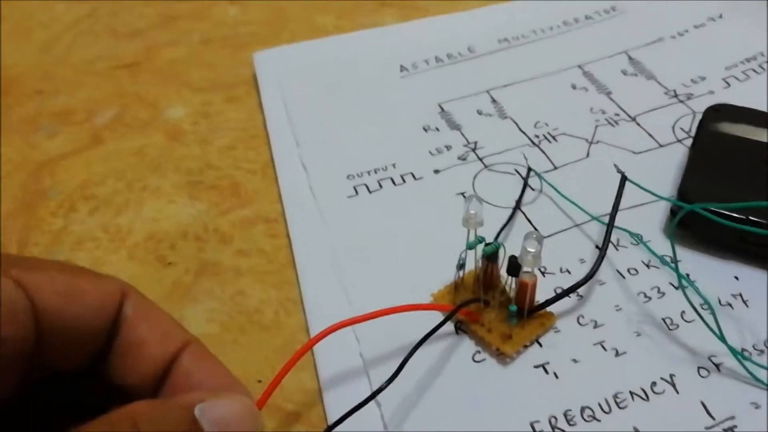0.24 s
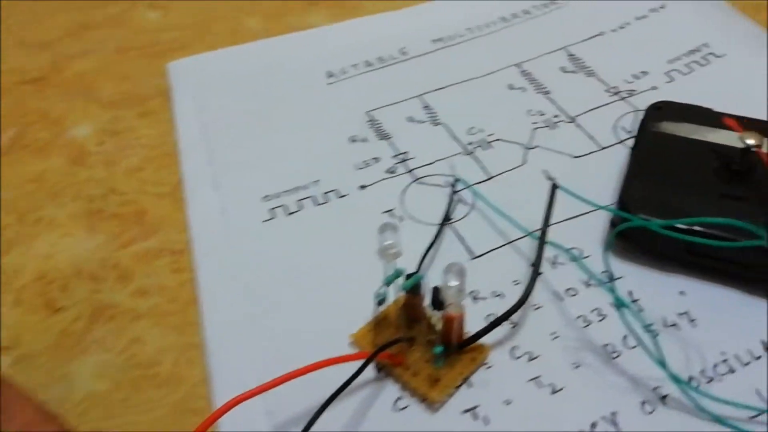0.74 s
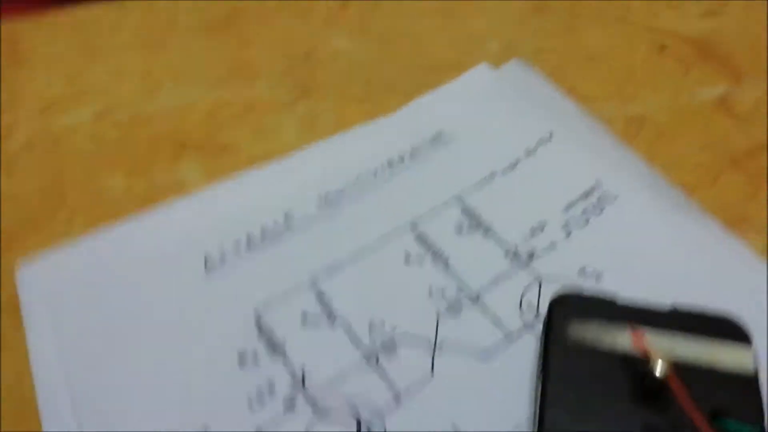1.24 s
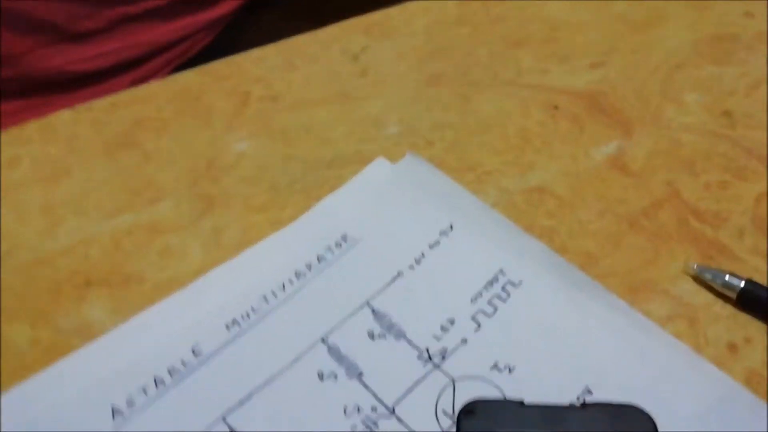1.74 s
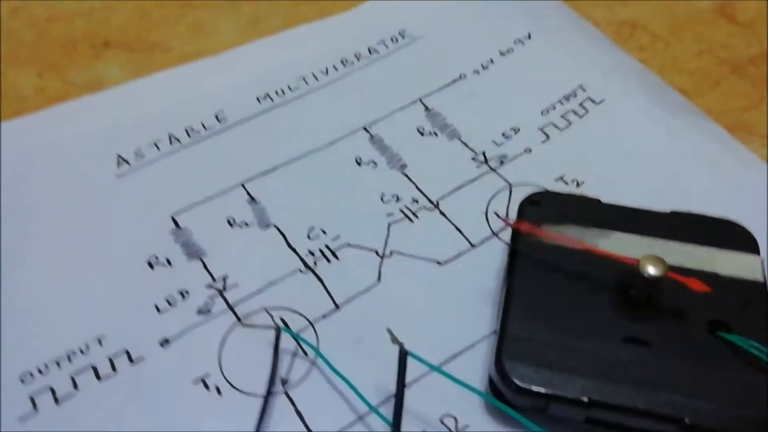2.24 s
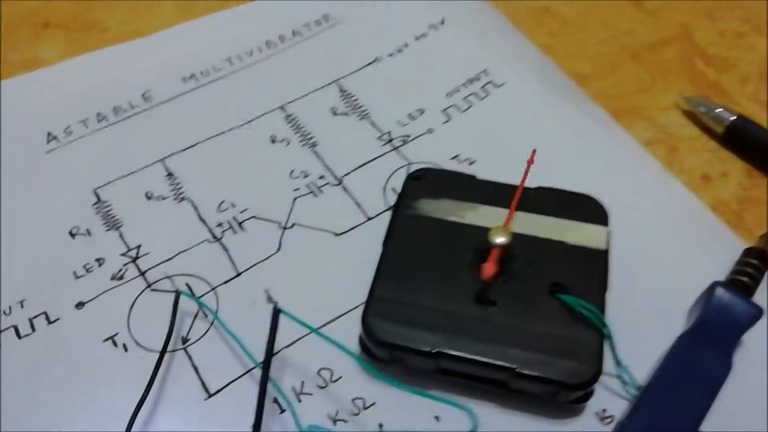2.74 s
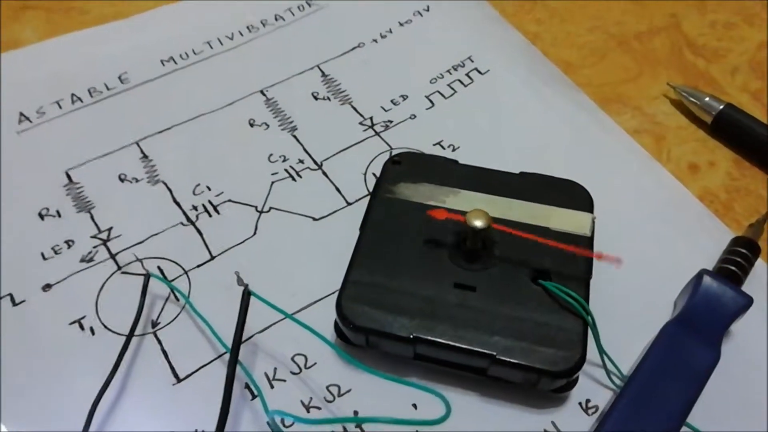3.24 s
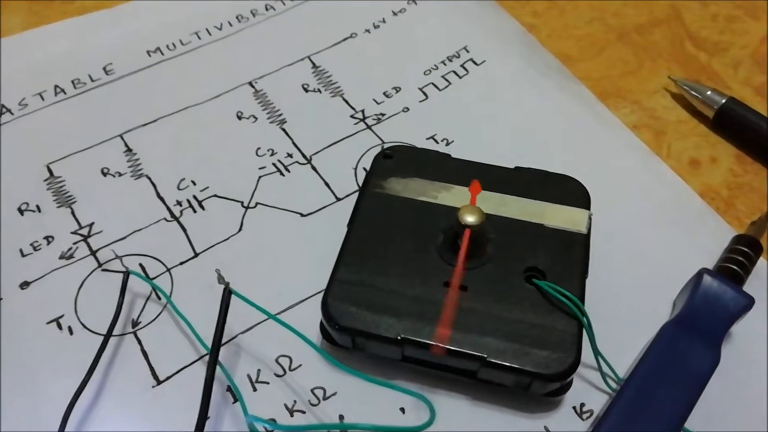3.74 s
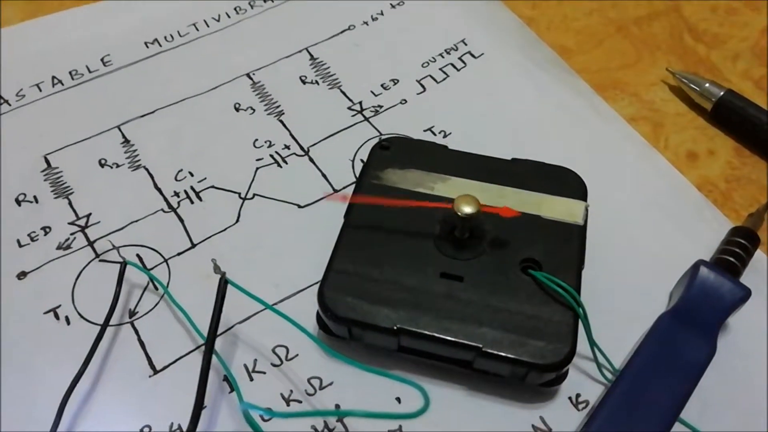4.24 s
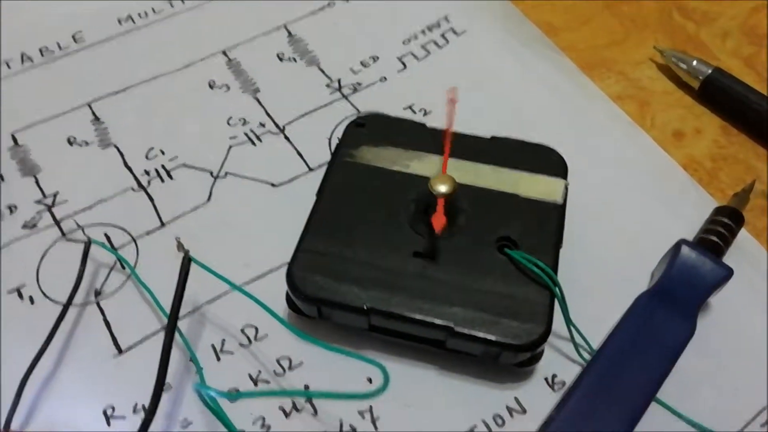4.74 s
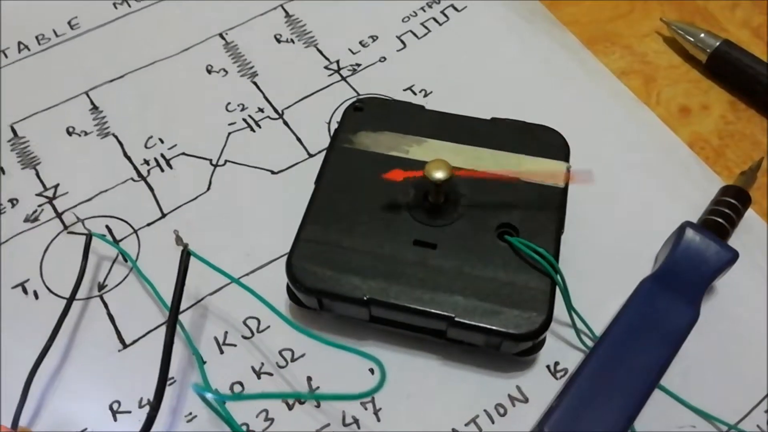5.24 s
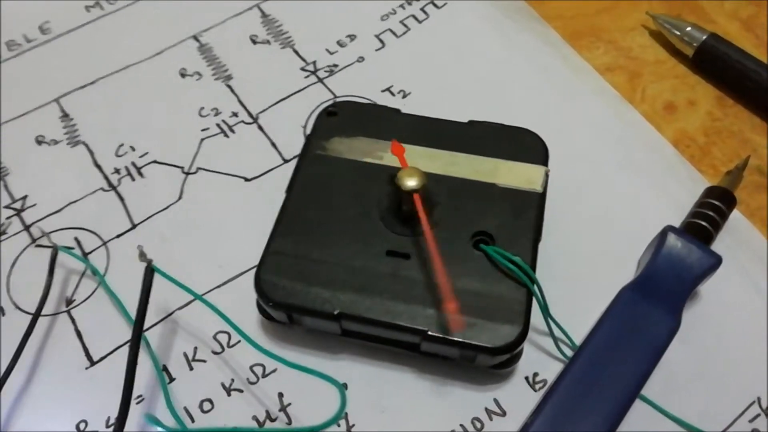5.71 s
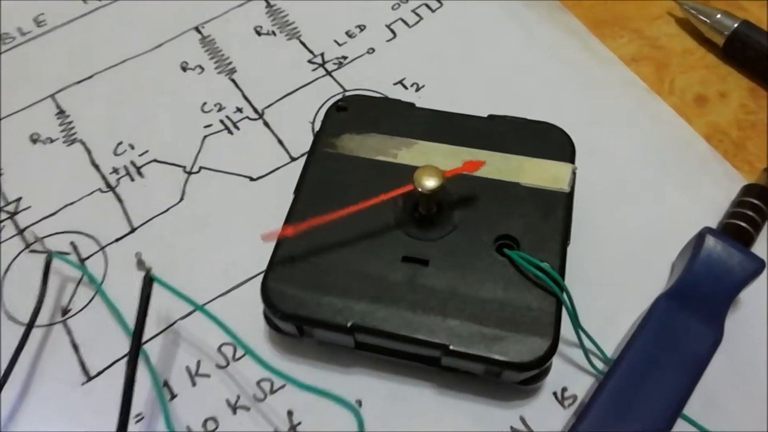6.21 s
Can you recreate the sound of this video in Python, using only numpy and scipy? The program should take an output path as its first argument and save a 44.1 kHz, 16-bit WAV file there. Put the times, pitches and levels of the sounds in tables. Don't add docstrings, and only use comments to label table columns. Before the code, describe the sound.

Close, slightly unsteady stereo phone pickup of a tiny clock mechanism on a bench. Low room hum and a muffled knock come first, then a faint hum swells and plastic gears begin to chatter, pulsing faster until steady at about a dozen throbs a second. Brighter ticks poke through, with gusts of low air and heavy bumps on the microphone.

```python
import sys
import numpy as np
from scipy import signal
from scipy.fft import rfft, irfft
from scipy.io import wavfile
from scipy.ndimage import uniform_filter1d, map_coordinates

SR = 44100
rng = np.random.default_rng(int(sys.argv[2]) if len(sys.argv) > 2 else 0)


def voltage_ratio(level):
    return 10 ** (np.asarray(level, float) / 20)


def digitize_waveform(pressure):
    field = np.atleast_2d(pressure).T
    bounded = np.clip(field, -1, 1)
    quanta = np.round(bounded * 32767).astype(np.int16)
    wavfile.write(sys.argv[1], SR, quanta)


N = 285395
T = np.arange(N) / SR

# (time [s], strength [dB], brightness [dB])
HARD_STRIKES = [(1.593, -63.5, -37), (1.688, -58, -2), (1.774, -59, -32), (1.954, -49, -8),
                (2.062, -53.5, -28), (2.397, -51, -5), (2.506, -43, 2), (2.569, -63, 16), (2.733, -54, 10),
                (2.833, -37.5, -1.5), (2.895, -50, -3), (2.976, -44, 3), (3.114, -50.5, -7),
                (3.46, -62, 17), (3.53, -51, 1), (3.812, -52.5, -2), (3.875, -52.5, 3), (4.149, -49, -5),
                (4.413, -50.5, -2), (4.657, -52, 7), (4.702, -51, 5), (4.731, -53, 3), (4.872, -51, 8),
                (5.017, -51.5, -1), (5.317, -63, 13), (5.52, -58, -6), (5.635, -53, 6), (5.733, -56.5, 12),
                (5.881, -43.5, 1.5), (5.996, -51, -3)]
# (time [s], motor level [dB], turn of the phone)
RATTLE = [(1.35, -90, 10), (1.49, -76, 13), (1.55, -67.5, 14), (1.62, -63, 14.5), (1.8, -62, 11.5),
          (2.1, -60.5, 11.5), (2.45, -61.5, 9.5), (2.8, -61, 8.5), (3.02, -64, 9), (3.18, -69, 5.5),
          (3.4, -63.5, 2.5), (3.8, -67.5, 3), (4.3, -64.5, 4), (4.75, -65.5, 3.5), (5.15, -65, 3.5),
          (5.6, -63, 3.5), (6.0, -67.5, 1.5), (6.47, -63.5, 8.5)]
# (time [s], turns made [1])
ROTOR_TURNS = [
    (1.591, 0),
    (2.156, 6),
    (2.299, 8),
    (2.83, 14),
    (3.528, 24),
    (4.236, 34),
    (4.657, 40),
    (5.02, 45),
    (5.881, 57),
    (6.444, 65),
]
# (frequency [Hz], width [Hz], level [dB])
CASE_LEFT_MODES = [(2432, 430, 1.5), (2807, 190, -1), (3220, 290, -3), (3640, 166, -6.5), (1834, 70, -7.5)]
CASE_RIGHT_MODES = [(1914, 114, 1), (2288, 320, 5), (2740, 220, -3.5), (3440, 230, -17)]
# (frequency [Hz], width [Hz], level [dB])
PORT_LEFT_MODES = [(4200, 200, -4.5), (4990, 380, 4.5), (5670, 330, 3.5), (7220, 180, -11),
                   (7970, 120, -12.5)]
PORT_RIGHT_MODES = [(7930, 210, -7), (8567, 130, 8), (9210, 590, -2.5), (8170, 240, -3.5)]
# (frequency [Hz], width [Hz], level [dB])
FACE_LEFT_MODES = [(6160, 480, -3), (6630, 550, -10)]
FACE_RIGHT_MODES = [(4220, 260, 4.5), (5100, 650, -5), (5800, 450, -2), (6280, 300, -0.5), (6830, 350, -9)]
# (frequency [Hz], width [Hz], level [dB])
BENCH_MODES = [(1137, 188, -4), (1538, 310, -4.5)]
# (time [s], peak [dB], width [ms])
PUSHES = [(0.893, -36.5, 3), (1.327, -45, 2.9), (1.512, -39, 4.3), (2.084, -44, 8.8), (2.325, -30.5, 4.8),
          (2.366, -34, 6.4), (2.403, -34, 5.2), (2.419, -35, 4.4), (2.503, -29, 3.9), (2.528, -45, 4.4),
          (2.543, -29, 3.2), (2.577, -31.5, 3.6), (2.598, -34, 3.3), (2.625, -37, 3.04),
          (2.653, -23.5, 1.9), (2.664, -17, 2.6), (2.673, -25.5, 1.85), (2.682, -21.5, 2.74),
          (2.686, -30, 6.6), (2.701, -29.5, 5.4), (2.864, -39, 8.5), (4.214, -27.5, 3.9),
          (4.263, -33.5, 7.3), (4.28, -44, 6.8), (4.337, -37, 6.1), (4.352, -35, 5.7), (5.239, -38.5, 6.8),
          (5.294, -38.5, 5.2), (5.354, -40.5, 4.6), (6.456, -37, 4.1)]
# (centre [s], peak [dB], half length [s], upper rumble [dB])
AIR_GUSTS = [(0.363, -58, 0.093, -6), (.8, -48.5, 0.14, -13), (1.22, -73, 0.059, 5), (1.516, -50, 0.13, -8),
             (1.803, -65, 0.11, -21), (2.043, -58, 0.041, -1), (2.497, -41.5, .12, -4.5),
             (2.845, -52.5, .05, -16), (3.472, -56, 0.089, -8.5), (3.89, -59, 0.036, -20),
             (4.195, -42.5, 0.079, -6), (4.405, -49.5, 0.044, -8), (4.926, -50.5, 0.037, -3.5),
             (5.3, -56, 0.077, -4), (5.557, -58.5, 0.055, -8), (6.09, -50.5, 0.04, -10),
             (6.358, -52, 0.072, -3)]
# (frequency [Hz], level [dB], decay time t60 [s])
KNOCK_MODES = [(570, -49.5, 0.34), (716, -48.5, 0.42), (882, -40.5, 0.25), (1110, -58, 0.84),
               (1530, -55, 0.76), (2270, -56, .3), (3240, -61, 0.24), (4600, -64, 0.2), (6550, -59, 0.22)]
# (frequency [Hz], density [dB per Hz])
ROOM_SPECTRUM = [(59, -32), (100, -16.5), (219, -1), (388, -9.5), (470, -15.5), (749, -10), (925, -18),
                 (1100, -15.5), (1860, -19.5), (2400, -26.5), (3910, -34), (6230, -32), (7540, -38.5),
                 (14900, -37.5), (15800, -39)]
# (frequency [Hz], correlation [1])
PORT_LIKENESS = [(100, 1), (300, 0.93), (450, 0.0096), (650, -0.25), (950, -0.53), (1500, 0.76),
                 (2200, -0.023), (16000, -0.082)]
# (frequency [Hz], width [Hz], gain added to 1 [1])
ROOM_TINT_LEFT = [(7200, 190, -0.028), (725, 500, -0.33), (9000, 1800, -0.17)]
ROOM_TINT_RIGHT = [(1878, 200, 1), (8800, 600, 0.52), (10000, 240, 0.86), (6460, 1500, -0.34)]

TOOTH_HZ, TOOTH_JITTER, TOOTH_SCATTER_DB = 117.1, 0.25, 4
THROB_S, THROB_DB, THROB_TURNS, STRIKE_THROB = 0.014, 4.5, 0.2, 0.22
TURN_SCATTER_DB, TURN_DB = 2.5, -3.5
CASE_KICK_DB, PORT_KICK_DB = 3, 4
LOOSE_DB, LOOSE_SCATTER_DB, LOOSE_SPREAD_S, LOOSE_BRIGHT_DB, BETWEEN_DB = 5.5, 3.5, 0.01186, 1, -3
WHEEL_TURNS, WHEEL_AT_TURN, WHEEL_DB = 8.83, 14.53, 1
RIGHT_DB, RIGHT_SHADE = -5.5, 0.41
HUM_DB, HUM_TURN, HUM_START_S, HUM_RISE_S = -73.5, 0.63, 1.24, 0.079
STRAIN_S, STRAIN_WIDTH_S, STRAIN_DB = 1.44, 0.08, -1
CALM_DB, CALM_UPPER_DB = -65.5, -75.5
KNOCK_S, ROOM_DB = 0.176, -55
NOTCH_HZ, NOTCH_WIDTH_HZ, NOTCH_DB = 7560, 130, -3


def motor():
    s, *columns = np.transpose(RATTLE)
    case_db, pan_db = (np.interp(T, s, c) for c in columns)
    left_db = case_db + 0.3
    right_db = case_db + RIGHT_DB - RIGHT_SHADE * pan_db
    strain = np.exp(-0.5 * ((T - STRAIN_S) / STRAIN_WIDTH_S) ** 2)
    hum_db = HUM_DB + HUM_TURN * pan_db + STRAIN_DB * strain
    hum_db = hum_db - 25 / (1 + np.exp((T - HUM_START_S) / HUM_RISE_S))

    when, strike_db, bright_db = hard_strikes()
    strike_right = strike_db + bright_db / 2
    strike_case = strike_db - bright_db / 2
    strike_left = strike_db - 6.0 + 0.24 * np.interp(when, T, pan_db)

    throb = throbbing()
    case_db = case_db + CASE_KICK_DB * (throb - 0.5)
    left_db = left_db + PORT_KICK_DB * (throb - 0.5)
    right_db = right_db + PORT_KICK_DB * (throb - 0.5) + WHEEL_DB * wheel(T)
    mesh = teeth(throb)
    grit = rng.standard_normal((2, N))

    def part(modes, level_db, hit_db, width_s, turn_db, side=0):
        body = ring(modes)
        rubbing = mesh * np.sign(grit[1]) ** side
        steady = voltage_ratio(level_db) * unit(signal.fftconvolve(rubbing, body)[:N])
        ringing = signal.fftconvolve(grit[side], body)[:N]
        ringing = ringing / np.sqrt(uniform_filter1d(ringing ** 2, size=200) + 1e-12)
        struck = ringing * slide(strikes(when, hit_db), width_s)
        return voltage_ratio(turn_db * np.clip(pan_db, -12, 12)) * (steady + struck)

    left = part(CASE_LEFT_MODES, case_db + 7.0, strike_case - 5, 0.0029, 0.05)
    left += part(PORT_LEFT_MODES, left_db - 2.0, strike_left - 1.5, 0.0021, -0.079)
    left += part(FACE_LEFT_MODES, left_db - 6.0, strike_left - 6, 0.0032, 0.26)
    right = part(PORT_RIGHT_MODES, right_db + 1.0, strike_right + 0.5, 0.0011, 0.046)
    case_right = part(CASE_RIGHT_MODES, case_db + 9.5, strike_case - 1.5, 0.0033, -0.5)
    right += late(case_right, 0.0002 - 0.000014 * pan_db)
    right += part(FACE_RIGHT_MODES, left_db - 11.0, strike_left - 11, 0.0027, 0.63, side=1)
    evened = mesh / np.sqrt(uniform_filter1d(np.abs(mesh), 900))
    hum = voltage_ratio(hum_db + 4.0) * unit(signal.fftconvolve(evened, ring(BENCH_MODES))[:N])
    return np.array([left + 0.97 * hum, right + 1.28 * hum])


def teeth(throb):
    gap, strength = rng.standard_normal((2000, 2)).T
    times = np.cumsum(np.exp(TOOTH_JITTER * gap)) / TOOTH_HZ
    heard = times < T[-1]
    blows = strikes(times[heard], TOOTH_SCATTER_DB * np.minimum(strength, 1)[heard])
    contacts = unit(slide(blows, 0.0011) * rng.standard_normal(N))
    return voltage_ratio(THROB_DB * throb) * (contacts + 0.83 * rng.standard_normal(N))


def hard_strikes():
    s, level_db, pan_db = np.transpose(RATTLE)
    tight = turns()
    place, strength, colour = np.clip(rng.standard_normal((3 * len(tight), 3)).T, -2, [[2], [1], [1]])
    between = np.tile([0, 0, 1], len(tight))
    when = np.repeat(tight, 3) + between * np.repeat(np.gradient(tight), 3) / 2
    when = when + LOOSE_SPREAD_S * place
    db = np.interp(when, s, level_db) + LOOSE_DB + BETWEEN_DB * between
    db = db + WHEEL_DB / 2 * wheel(when) + LOOSE_SCATTER_DB * strength
    bright_db = LOOSE_BRIGHT_DB + 2 * WHEEL_DB * wheel(when)
    bright_db = bright_db - 0.77 * np.interp(when, s, pan_db) + 4 * colour
    return np.hstack([np.transpose(HARD_STRIKES), [when, db, bright_db]])


def throbbing():
    s, made = np.transpose(ROTOR_TURNS)
    angle = np.interp(T, [0, *s, s[-1] + 1], [-16, *made, made[-1] + 14])
    nearest = np.round(angle)
    scatter = np.clip(rng.standard_normal(100), -2, 1)
    size = voltage_ratio(TURN_DB + TURN_SCATTER_DB * scatter)[nearest.astype(int)]
    times = np.array(HARD_STRIKES)[:, 0]
    swell = np.exp(-0.5 * ((T[:6001] - T[3000]) / THROB_S) ** 2)
    hard = signal.fftconvolve(strikes(times, 0 * times), swell, mode="same")
    return size * np.exp(-0.5 * ((angle - nearest) / THROB_TURNS) ** 2) + STRIKE_THROB * hard


def wheel(when):
    s, made = np.transpose(ROTOR_TURNS)
    return np.cos(2 * np.pi * (np.interp(when, s, made) - WHEEL_AT_TURN) / WHEEL_TURNS)


def turns():
    s, made = np.transpose(ROTOR_TURNS)
    return np.interp(np.arange(made[-1] + 1), made, s)


def slide(blows, width_s):
    t = T[:2000] - T[176]
    shape = np.exp(-0.5 * (t / width_s) ** 2) + 0.24 * (t > 0) * np.exp(-t / 0.0053)
    return signal.fftconvolve(blows, shape)[176:N + 176]


def strikes(times, db):
    return np.bincount(np.clip((times * SR).astype(int), 0, N - 1), voltage_ratio(db), N)


def ring(modes):
    f = np.fft.rfftfreq(2048, 1 / SR)
    power = sum(voltage_ratio(2 * db) / (1 + ((f - hz) / (0.71 * w)) ** 2) ** 2 for hz, w, db in modes)
    cepstrum = irfft(0.5 * np.log(power + voltage_ratio(-120)))
    cepstrum[1:1024] *= 2
    cepstrum[1025:] = 0
    return irfft(np.exp(rfft(cepstrum)))[:1024]


def late(x, lag_s):
    return map_coordinates(x, [(T - lag_s) * SR], order=3, mode="nearest")


def bumps():
    out = np.zeros(N + 6001)
    t = T[:6001] - T[3000]
    for s, db, ms in PUSHES:
        u = (t / (ms * np.where(t < 0, 0.0006, 0.0009))) ** 2
        push = (1 - np.where(t < 0, 1.1, 0.7) * u) * np.exp(-u / 2)
        start = int(s * SR)
        out[start:start + 6001] += voltage_ratio(db) * push
    out = out[3000:N + 3000]
    return np.array([1.16 * late(out, -0.00044), 1.01 * late(out, 0.00037)])


def air():
    f = np.fft.rfftfreq(N, 1 / SR)
    swells = [(db, upper_db, np.exp(-0.5 * ((T[::64] - s) / half_s) ** 2))
              for s, db, half_s, upper_db in AIR_GUSTS]
    deep_gain = voltage_ratio(CALM_DB) + np.repeat(sum(voltage_ratio(db) * e for db, _, e in swells), 64)[:N]
    upper_gain = voltage_ratio(CALM_UPPER_DB) + np.repeat(sum(voltage_ratio(db + up) * e for db, up, e in swells), 64)[:N]
    deep = f ** 2 / (15 ** 2 + f ** 2) / (1 + (f / 65) ** 4)
    upper = (f / 95) ** 2 / (1 + (f / 105) ** 5)
    gust_db = 3.5 * walk(35)
    sides = np.array([[1], [-1]])
    low = unit(shaped(deep)) + 0.17 * sides * unit(shaped(deep))
    high = unit(shaped(upper)) + 0.25 * sides * unit(shaped(upper))
    return deep_gain * voltage_ratio(gust_db) * low + upper_gain * voltage_ratio(0.44 * gust_db) * high


def knock():
    t = np.clip(T - KNOCK_S, 0, None)
    f = np.fft.rfftfreq(N, 1 / SR)
    out = np.zeros((2, N))
    for hz, db, t60 in KNOCK_MODES:
        width = (0.08 + hz / 30000) * hz
        band = 1 / (1 + ((f - hz) / width) ** 4)
        echo = [unit(shaped(band)) for _ in range(2)]
        out += voltage_ratio(db) * (1 - np.exp(-t / 0.018)) * voltage_ratio(-60 * t / t60) * echo
    return out


def room():
    f = np.fft.rfftfreq(N, 1 / SR) + 1
    hz, db = np.transpose(ROOM_SPECTRUM)
    gain = voltage_ratio(np.interp(np.log(f), np.log(hz), db))
    hz, correlation = np.transpose(PORT_LIKENESS)
    alike = np.clip(np.interp(np.log(f), np.log(hz), correlation), -0.99, 0.99)
    mid = shaped(gain * np.sqrt(1 + alike))
    side = shaped(gain * np.sqrt(1 - alike))
    lift = [1 + sum(g * np.exp(-0.5 * ((f - hz) / w * 2) ** 2) for hz, w, g in port)
            for port in (ROOM_TINT_LEFT, ROOM_TINT_RIGHT)]
    both = irfft(rfft([mid + side, mid - side]) * lift, N)
    return voltage_ratio(ROOM_DB + 1.03 * walk(24)) * unit(both)


def walk(rate):
    k = int(SR / rate)
    return unit(uniform_filter1d(uniform_filter1d(rng.standard_normal(N), k), k))


def shaped(gain):
    return irfft(rfft(rng.standard_normal(N)) * gain, N)


def unit(x):
    return x / np.sqrt(np.mean(x ** 2))


def scene():
    return motor() + bumps() + air() + room() + knock()


def band_limit(x):
    return signal.sosfilt(signal.butter(12, 15730, fs=SR, output="sos"), x)


def record(dry):
    f = np.fft.rfftfreq(N, 1 / SR)
    top_lift_db = 2.5 * np.exp(-((f - 14750) / 400) ** 2)
    roll_off_db = 6 / (1 + np.exp((15300 - f) / 90))
    notch_db = NOTCH_DB * np.exp(-((f - NOTCH_HZ) / NOTCH_WIDTH_HZ) ** 2)
    colour = voltage_ratio(top_lift_db - roll_off_db + notch_db)
    return band_limit(irfft(rfft(dry) * colour, N))


dry = scene()
out = record(dry)
digitize_waveform(out)
```